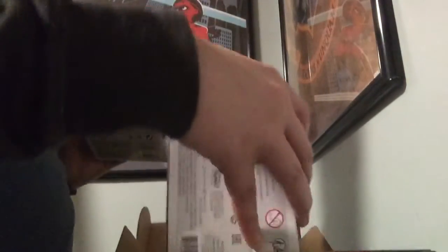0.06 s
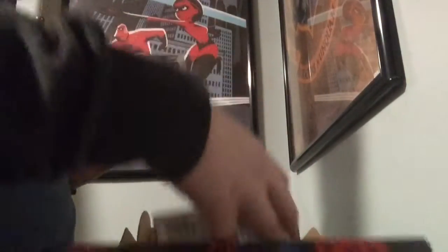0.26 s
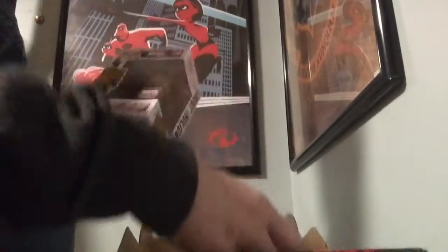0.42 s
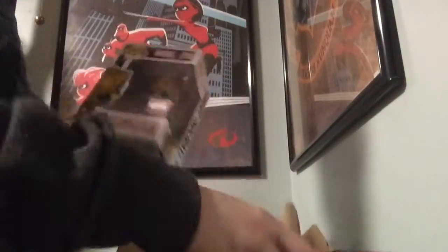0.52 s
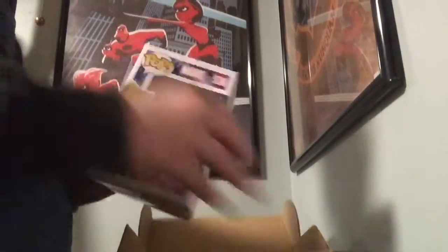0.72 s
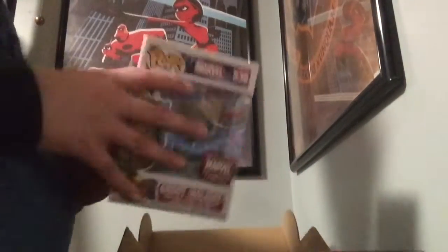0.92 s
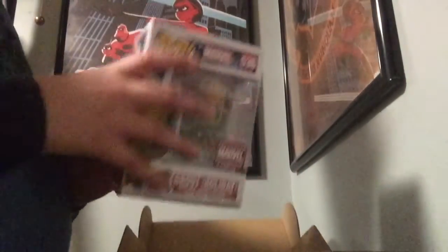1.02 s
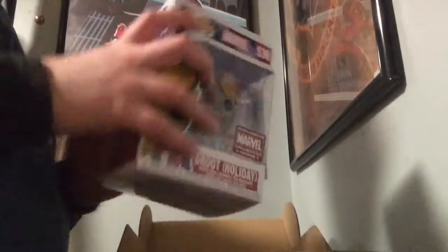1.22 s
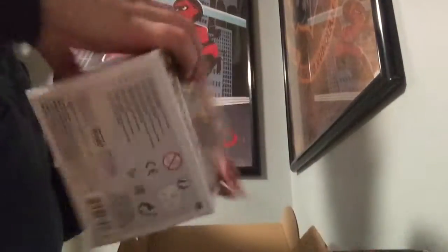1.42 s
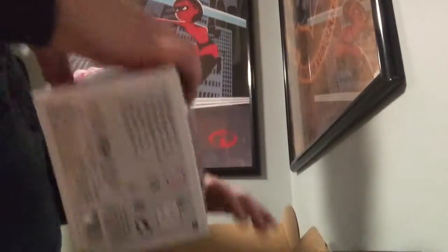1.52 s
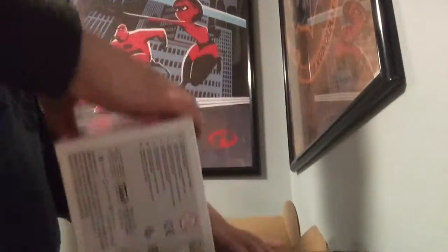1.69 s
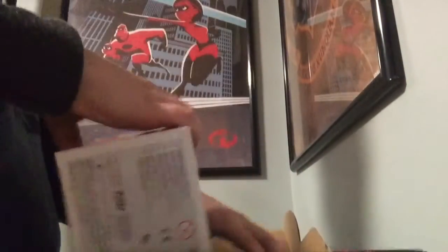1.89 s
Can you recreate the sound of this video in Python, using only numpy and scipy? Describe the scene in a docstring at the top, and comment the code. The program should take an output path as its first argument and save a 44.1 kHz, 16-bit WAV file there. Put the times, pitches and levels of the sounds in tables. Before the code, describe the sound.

Hollow knocks and a short rasping scrape of light cardboard boxes, then soft finger taps and rubbing

```python
"""At a table in a small room, cardboard toy boxes with plastic windows are handled.
Struck modes make the hollow thuds, and shaped noise makes the board's clacks and the window's ticks.
One box is set down, scrapes along its neighbours and knocks against them: random clicks make the rasp.
Fingers tap and brush a second box, mostly afterwards; rubbing is clicks that swell and fade.
The microphone hears the boxes over a short room tail and quiet air with a low rumble."""
import sys
import numpy as np
from scipy import signal
from scipy.fft import rfft, irfft, next_fast_len
from scipy.io import wavfile
from scipy.ndimage import uniform_filter1d

SR = 44100
rng = np.random.default_rng(int(sys.argv[2]) if len(sys.argv) > 2 else 0)


def digitize_waveform(pressure):
    """Quantize a signal to 16-bit integers and store it at the path in sys.argv[1].

    Rows of a 2-D input are taken as channels; values are limited to [-1, 1].
    """
    field = np.atleast_2d(pressure).T
    bounded = np.clip(field, -1, 1)
    quanta = np.round(bounded * 32767).astype(np.int16)
    wavfile.write(sys.argv[1], SR, quanta)


N = 85995  # length [samples]


def undb(db):
    """Decibels to gain."""
    return 10 ** (np.asarray(db) / 20)


def unit(x, span=None):
    """Scale to rms 1, over the first span seconds if given."""
    measured = x[:int(span * SR)] if span else x
    return x / np.sqrt(np.mean(measured ** 2) + 1e-20)


PANEL_WIDTH_HZ, PANEL_LIFT_DB = 30, 2  # each resonant peak


def colour(x, points, tilt_db=0, peaks=()):
    """Causal (minimum-phase) filter through (Hz, dB) points, with a tilt per octave and resonant peaks."""
    size = next_fast_len(len(x) + 4096, True) // 2 * 2
    f = np.maximum(np.fft.rfftfreq(size, 1 / SR), 1)
    hz, db = np.array(points, float).T
    curve = np.interp(np.log(f), np.log(hz), db)
    curve = curve + tilt_db * np.log2(np.clip(f, hz[0], hz[-1]) / hz[0])
    for centre in peaks:
        curve = curve + PANEL_LIFT_DB / (1 + (2 * (f - centre) / PANEL_WIDTH_HZ) ** 2)
    # folding the cepstrum forward in time makes the filter causal
    cepstrum = irfft(np.log(undb(curve)))
    cepstrum[1:size // 2] *= 2
    cepstrum[size // 2 + 1:] = 0
    response = np.exp(rfft(cepstrum))
    return irfft(rfft(x, size) * response)[:len(x)]


def fade(t, t60):
    """Exponential decay, 60 dB down at t60."""
    return np.exp(-np.log(1000) * t / t60)


def ring(t, modes):
    """Damped modes struck together."""
    return sum(undb(db) * np.sin(2 * np.pi * hz * t) * fade(t, t60) for hz, db, t60 in modes)


def burst(t, rise, t60):
    """A crowd of short-lived modes: noise that rises fast and dies away."""
    return rng.standard_normal(len(t)) * (1 - np.exp(-t / rise)) * fade(t, t60)


def add(out, x, start):
    """Mix x in from a start time."""
    i = int(start * SR)
    out[i:i + len(x)] += x[:max(N - i, 0)]


# colour of the room air: (frequency [Hz], relative level [dB per Hz])
AIR = [(25, -25.5), (50, -3.5), (80, -12.5), (180, -13.5), (600, -25.5), (1500, -25.5), (3500, -30),
       (7000, -33), (11000, -38.5)]
AIR_DB = -65  # rms before the microphone


def background():
    """Quiet room air with a low rumble: steady coloured noise."""
    return undb(AIR_DB) * unit(colour(rng.standard_normal(N), AIR))


ROOM_T60_S, ROOM_TREBLE_T60_S = 0.22, 0.21
ROOM_DB, ROOM_GAP_S = -12, 0.0067  # tail energy against the direct sound; silence before the tail


def room(x):
    """Near walls return a short tail whose treble dies first."""
    t = np.arange(SR // 2) / SR
    noise = rng.standard_normal(len(t))
    low = signal.sosfilt(signal.butter(1, 2000, fs=SR, output="sos"), noise)
    tail = low * fade(t, ROOM_T60_S) + (noise - low) * fade(t, ROOM_TREBLE_T60_S)
    tail = tail * (t > ROOM_GAP_S)
    return x + undb(ROOM_DB) * signal.fftconvolve(x, tail / np.linalg.norm(tail))[:N]


GRAINS_PER_S, GRAIN_SPREAD_DB = 5500, 2.5
JUDDER_HZ = 110.4  # new random judder levels per second


def slips(judder_db):
    """Fibres catch and let go: dense uneven clicks that come in judders."""
    t = np.arange(N) / SR
    happens = rng.random(N) < GRAINS_PER_S / SR
    size_db = GRAIN_SPREAD_DB * np.minimum(rng.exponential(size=N), 5)
    clicks = happens * rng.choice([-1, 1], N) * undb(size_db)
    judder = np.interp(t * JUDDER_HZ, np.arange(N), rng.standard_normal(N))
    return clicks * undb(judder_db * judder)


# fingers brushing the window: (centre time [s], width at 1/e [s], level [dB])
BRUSHES = [(.135, 0.024, -51.5), (.176, 0.044, -58), (1.172, 0.21, -60.5), (1.42, 0.21, -64),
           (1.93, 0.052, -60)]
# fingers scuffing the card: (centre time [s], width at 1/e [s], level [dB])
SCUFFS = [(.11, 0.14, -49.5), (.765, 0.042, -44.5), (1.275, 0.13, -56), (1.34, 0.15, -59),
          (1.93, 0.084, -44.5)]
# colour of a brush on the window: (frequency [Hz], relative level [dB per Hz])
BRUSH_COLOUR = [(300, 6), (1000, 1), (2500, 0.5), (3400, -5), (4250, 3), (5000, -9), (6500, -3),
                (8500, -12.5), (10500, -16.5), (12500, -16), (16000, -10)]
# card of a held box, clacked or scuffed: (frequency [Hz], relative level [dB per Hz])
HELD_BOARD = [(150, -6.5), (300, 2.5), (550, 1.5), (720, -12), (900, -1), (1400, -5.5), (4200, -17.5),
              (5000, -26), (12000, -37.5)]
# bending resonances of the card panels: frequency [Hz]
PANELS = [650, 932, 1245, 1605, 1748, 1940, 2255, 3145]
SCUFF_TILT_DB = -4  # per octave
FINGER_JUDDER_DB = 2.5  # skin slides more evenly than card


def strokes(rows):
    """Level of finger strokes, each a bell-shaped swell and fade."""
    t = np.arange(N) / SR
    return sum(undb(db) * np.exp(-(2 * (t - at) / width) ** 2) for at, width, db in rows)


def fingers():
    """Skin slips in short strokes: bright on the window, dull on the card."""
    brush = unit(colour(slips(FINGER_JUDDER_DB), BRUSH_COLOUR))
    scuff = unit(colour(slips(FINGER_JUDDER_DB), HELD_BOARD, SCUFF_TILT_DB, PANELS))
    return brush * strokes(BRUSHES) + scuff * strokes(SCUFFS)


# colour of the plastic window: (frequency [Hz], relative level [dB per Hz])
WINDOW = [(1500, -9.5), (3700, 6.5), (5100, -2), (6500, 0), (8500, -7.5), (10500, -13.5), (12500, -12.5),
          (16000, -23)]
CRINKLES_PER_S, CRINKLE_T60_S = 130, 0.0089


def crinkles():
    """Thin plastic buckles in separate bright ticks of uneven size."""
    t = np.arange(SR // 20) / SR
    snaps = (rng.random(N) < CRINKLES_PER_S / SR) * rng.standard_normal(N)
    flutter = signal.fftconvolve(snaps, fade(t, CRINKLE_T60_S))[:N]
    return unit(colour(flutter * rng.standard_normal(N), WINDOW))


# box sliding on box: (time [s], friction level [dB], level of the hollow drone [dB])
SLIDE = [(0.373, -44.5, -37.5), (.42, -38.5, -44), (.45, -36, -34.5), (0.501, -37, -35),
         (0.525, -32.5, -24), (0.579, -41, -36), (0.623, -33, -36.5), (.67, -58.5, -30),
         (0.699, -44.5, -40), (0.739, -70, -54.5), (0.829, -70, -52.5)]
# colour of the rasp: (frequency [Hz], relative level [dB per Hz])
SCRAPE = [(300, 11.5), (550, -2), (900, 8.5), (1500, -3.5), (2500, -6.5), (5000, -19.5), (7500, -12.5),
          (10500, -19), (12500, -14), (16000, -27.5)]
# the modes that sliding drives most: (frequency [Hz], relative level [dB])
DRONE = [(100, -22.5), (190, -20), (260, -6.5), (340, 1), (430, -6), (600, -2), (1500, -18.5)]
# modes of a box on the table: (frequency [Hz], relative level [dB], t60 [s])
BOX_MODES = [(145, -4.5, 0.055), (189.5, 1, 0.14), (322.7, -6.5, 0.069), (344.7, 0.5, 0.057),
             (408.5, -10, 0.11), (492, -17, 0.038), (565, -18.5, 0.14), (728.3, -10.5, 0.041)]
JUDDER_DB = 4
CRINKLE_DB = -20.5  # relative to the rasp
DRONE_STEADY_S = .025  # span over which the drone is held even


def sliding():
    """The sliding box rasps and its window crinkles; friction holds its modes at an even drone."""
    t = np.arange(N) / SR
    grains = slips(JUDDER_DB)
    times, rasp_db, drone_db = np.array(SLIDE).T

    def along(db):
        """Gain along the slide, silent outside it."""
        return undb(np.interp(t, times, db, left=-np.inf, right=-np.inf))

    rasp = unit(colour(grains, SCRAPE, 0, PANELS)) + undb(CRINKLE_DB) * crinkles()
    ringing = signal.fftconvolve(grains, ring(t[:SR // 4], BOX_MODES))[:N]
    drone = unit(colour(ringing, DRONE))
    power = uniform_filter1d(drone ** 2, int(DRONE_STEADY_S * SR))
    drone = drone / np.sqrt(power + 1e-6)
    return rasp * along(rasp_db) + drone * along(drone_db)


# modes of the table: (frequency [Hz], relative level [dB])
TABLE_MODES = [(56, -11), (72, -9), (101, -22), (124, -3.5)]
BLOW_S = .02  # opening span over which each part's level is set
PUSH_S, TABLE_PUSH_S, TABLE_T60_S = 0.0027, 0.004, 0.025  # soft onsets of box and table; table decay
CLACK_RISE_S, CLACK_T60_S, TICK_RISE_S, TICK_T60_S = 0.00034, 0.056, 0.00038, 0.035
CRACK_GAIN, CRACK_S = 2.5, 0.0005  # extra bite at the instant the window is hit
CONTACT_OCTAVES = 0.89  # spread of the modes that one contact drives
BODY_LAG_S = 0.0014  # the whole box gives way just after its edge touches


def contact(ring_db, contact_hz, clack_db, tilt_db, tick_db, thump_db, modes, board):
    """One contact ticks the window and clacks the board, then rings the box and thumps what holds it."""
    out, t = np.zeros(SR // 2), np.arange(SR // 4) / SR
    table_modes = [(hz, db, TABLE_T60_S) for hz, db in TABLE_MODES]
    table = unit((1 - np.exp(-t / TABLE_PUSH_S)) * ring(t, table_modes), BLOW_S)
    # modes near the favoured pitch are driven hardest
    driven = [(hz, db - 10 * (np.log2(hz / contact_hz) / CONTACT_OCTAVES) ** 2, t60)
              for hz, db, t60 in modes]
    hollow = unit((1 - np.exp(-t / PUSH_S)) * ring(t, driven), BLOW_S)
    clack = unit(colour(burst(t, CLACK_RISE_S, CLACK_T60_S), board, tilt_db, PANELS), BLOW_S)
    crack = 1 + CRACK_GAIN * np.exp(-t / CRACK_S)
    tick = unit(colour(crack * burst(t, TICK_RISE_S, TICK_T60_S), WINDOW), BLOW_S)
    add(out, undb(clack_db) * clack + undb(tick_db) * tick, 0)
    add(out, undb(thump_db) * table - undb(ring_db) * hollow, BODY_LAG_S)
    return out


# fingers tap a box and its figure rattles inside: (time [s], hollow ring [dB],
# pitch that the contact favours [Hz], board clack [dB], clack tilt [dB per octave],
# note of the struck panel [Hz], window tick [dB])
TAPS = [ (.127, -47, 188, -45, -1.5, 930, -66), (0.866, -38, 450, -46, 0.1, 814, -64),
        (1.0128, -39, 169, -50, -0.3, 1155, -61.5), (1.035, -40.5, 137, -75, -2, 1100, -85),
        (1.0576, -43.5, 278, -44.5, 5.5, 1985, -55.5), (1.063, -46.5, 322, -43, -1.5, 1676, -62),
        (1.122, -54, 403, -54, -10, 1030, -84), (1.136, -45.5, 298, -57.5, 2.5, 1030, -70),
        (1.2222, -42.5, 475, -46.5, 1.5, 2110, -76), (1.2276, -45.5, 470, -42.5, -0.5, 900, -77),
        (1.275, -59, 500, -56.5, -2.5, 1800, -88), (1.314, -58, 510, -48.5, 0.9, 1046, -81),
        (1.323, -49, 490, -52.5, -0.3, 1243, -78), (1.498, -38.5, 350, -44.5, 2.2, 1031, -52.5),
        (1.831, -59, 310, -55, -4, 1300, -92), (1.853, -54.5, 306, -62.5, 2.5, 1886, -76.5),
        (1.895, -52, 320, -52, 3, 3505, -72), (1.898, -43, 294, -41, -1.2, 991, -72),
        (1.928, -43.5, 360, -51.5, 0, 3510, -76), (1.941, -60, 400, -53.5, 4, 1110, -75)]
# modes of a box held in the hand: (frequency [Hz], relative level [dB], t60 [s])
HELD_MODES = [(154.1, 0, 0.17), (197, 5.5, 0.086), (278.4, 3.5, 0.083), (331.4, -3.5, 0.11),
              (411, 4.5, 0.059), (436.6, 4, 0.065), (545.4, -4.5, 0.14), (654, 0.5, 0.067)]
TAP_THUMP_DB = -30  # relative to the hollow ring
NOTE_DB, NOTE_T60_S = -4.5, 0.045  # the struck panel's own note, relative to the clack


def taps():
    """Light contacts on a held box; each leaves the panel that it hits ringing on its own note."""
    out, t = np.zeros(N), np.arange(SR // 4) / SR
    for start, ring_db, contact_hz, clack_db, tilt_db, note_hz, tick_db in TAPS:
        thump_db = ring_db + TAP_THUMP_DB
        tap = contact(ring_db, contact_hz, clack_db, tilt_db, tick_db, thump_db, HELD_MODES, HELD_BOARD)
        note = unit(ring(t, [(note_hz, 0, NOTE_T60_S)]), BLOW_S)
        add(out, tap, start)
        add(out, undb(clack_db + NOTE_DB) * note, start)
    return out


# boxes knock on the table and on each other: (time [s], low thump [dB], hollow ring [dB],
# pitch that the contact favours [Hz], board clack [dB], clack tilt [dB per octave], window tick [dB])
KNOCKS = [ (0.05, -47.5, -49, 163, -51, -5.5, -89), (0.093, -65, -41.5, 180, -56, -4, -70),
          (0.2441, -63, -16, 300, -36.5, -4, -53), (0.28, -39, -35.5, 230, -60.5, 6, -79),
          (0.339, -44.5, -35, 171, -49.5, -4.5, -87.5), (0.3772, -47.5, -24.5, 203, -29, -5.5, -47.5),
          (0.407, -51, -55, 190, -49, -2.5, -59.5), (0.4324, -65.5, -49, 330, -43.5, 2, -49),
          (0.457, -60, -48.5, 350, -41.5, -5.5, -61), (0.474, -64, -34, 363, -47, -2, -48.5),
          (0.529, -63, -17, 274, -45.5, 5, -53), (.537, -55, -22.5, 393, -25.5, -0.5, -34),
          (0.559, -44, -21, 170, -68.5, -9, -72.5), (0.6207, -65, -33.5, 338, -53.5, 2, -54.5),
          (0.6358, -48, -27.5, 250, -21.5, 1.5, -36), (.646, -28.5, -22, 501, -35.5, -7.5, -46.5),
          (0.653, -33, -27.5, 157.3, -77, 7, -52), (0.752, -50.5, -47, 201, -54, 3.5, -69),
          (1.229, -48, -49.5, 540, -62, 10, -80)]
# clack of a box on the table: (frequency [Hz], relative level [dB per Hz])
BOARD = [(150, -29.5), (300, -15.5), (450, 12), (600, 6.5), (1000, 2), (1300, 6), (2000, 0), (3500, -9),
         (5000, -27.5), (12000, -52.5)]


def knocks():
    """Boxes strike the table and each other, each blow ringing the hollow box and its board."""
    out = np.zeros(N)
    for start, thump_db, ring_db, contact_hz, clack_db, tilt_db, tick_db in KNOCKS:
        knock = contact(ring_db, contact_hz, clack_db, tilt_db, tick_db, thump_db, BOX_MODES, BOARD)
        add(out, knock, start)
    return out


def scene():
    """Rubbing, taps and knocks in the room, over its air."""
    boxes = fingers() + sliding() + taps() + knocks()
    return (background() + room(boxes))[None]


TOP_HZ = 15950


def record(dry):
    """The microphone loses the deepest bass and cuts the top."""
    thin = signal.sosfilt(signal.butter(6, 42, "high", fs=SR, output="sos"), dry)
    return signal.sosfilt(signal.ellip(10, .2, 80, TOP_HZ, fs=SR, output="sos"), thin)


dry = scene()
out = record(dry)
digitize_waveform(out)
```